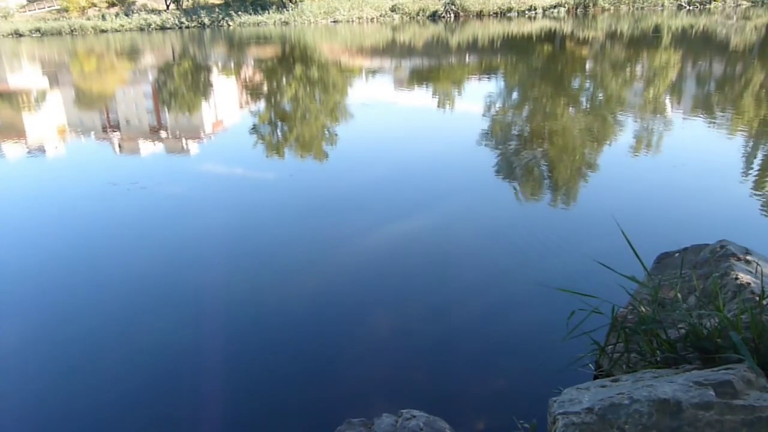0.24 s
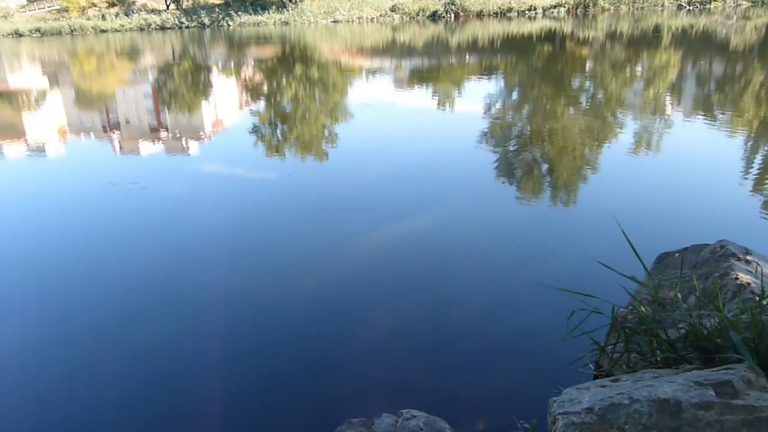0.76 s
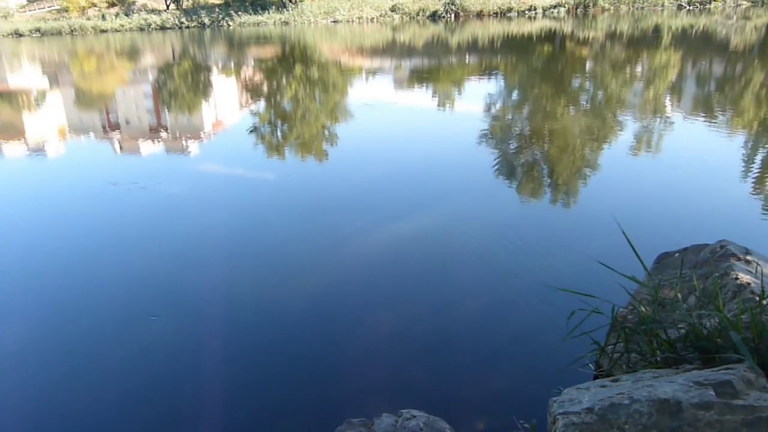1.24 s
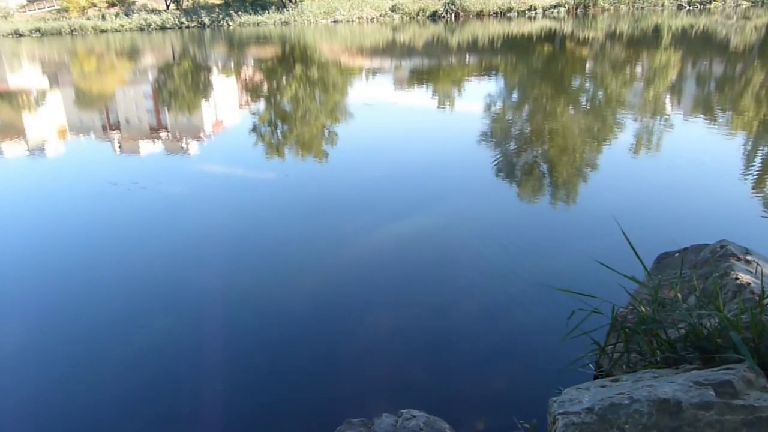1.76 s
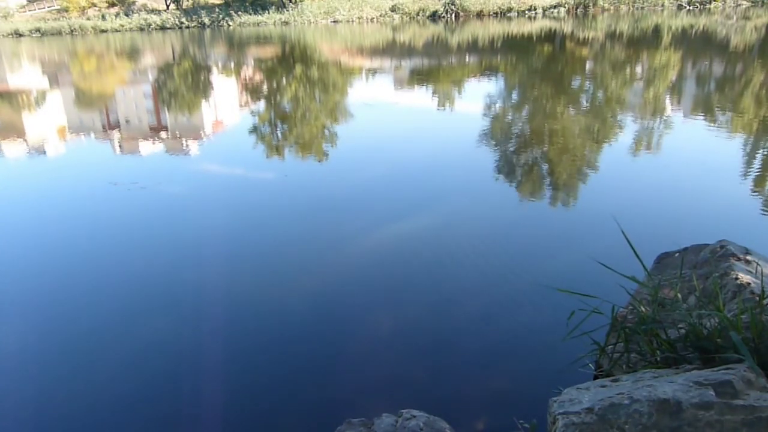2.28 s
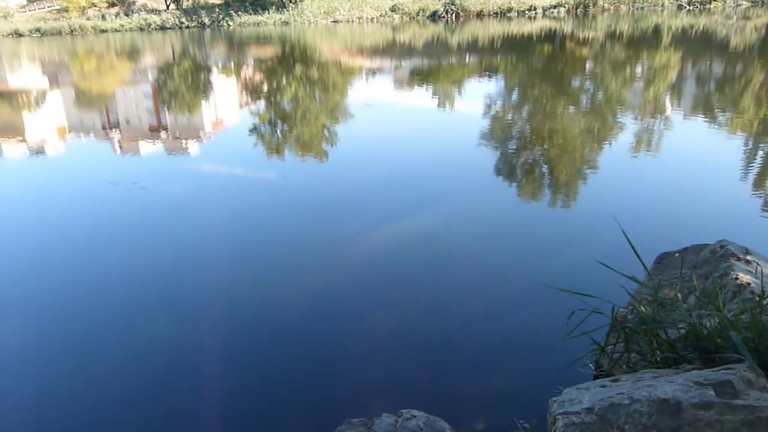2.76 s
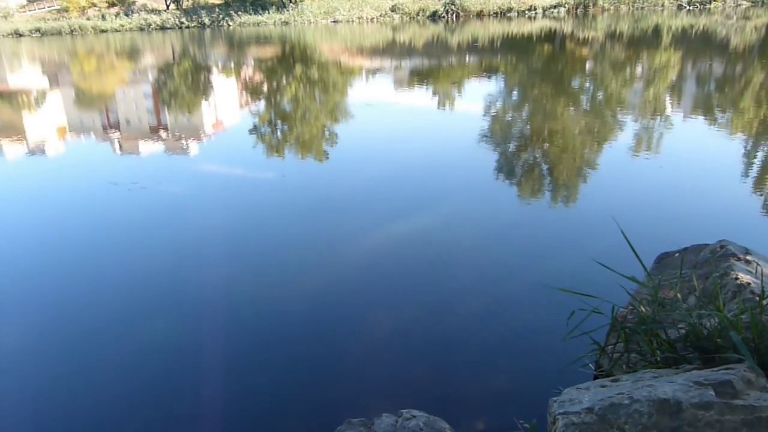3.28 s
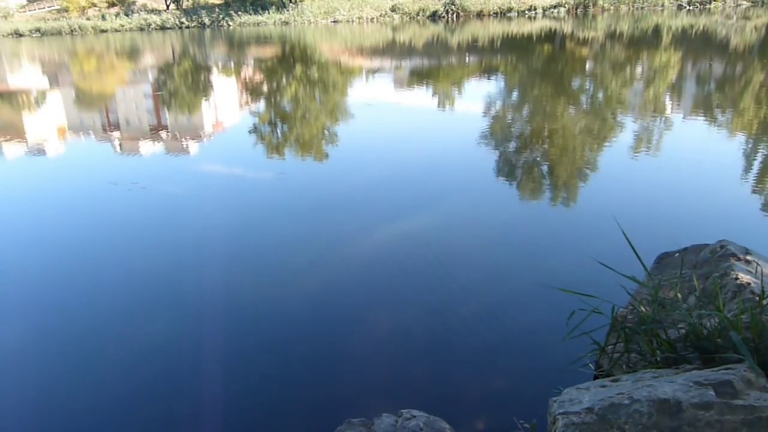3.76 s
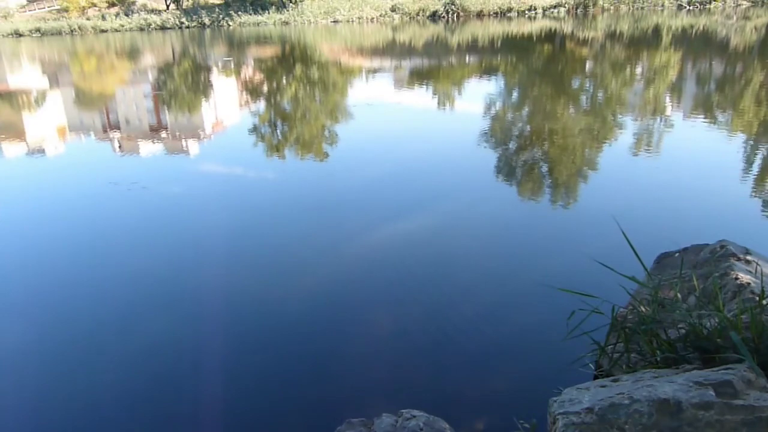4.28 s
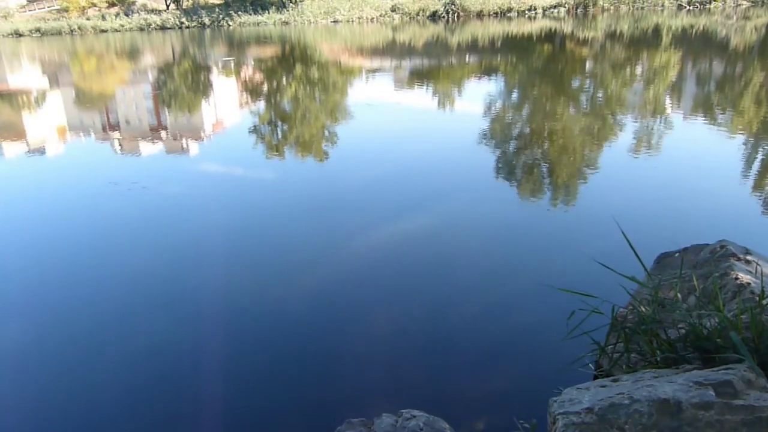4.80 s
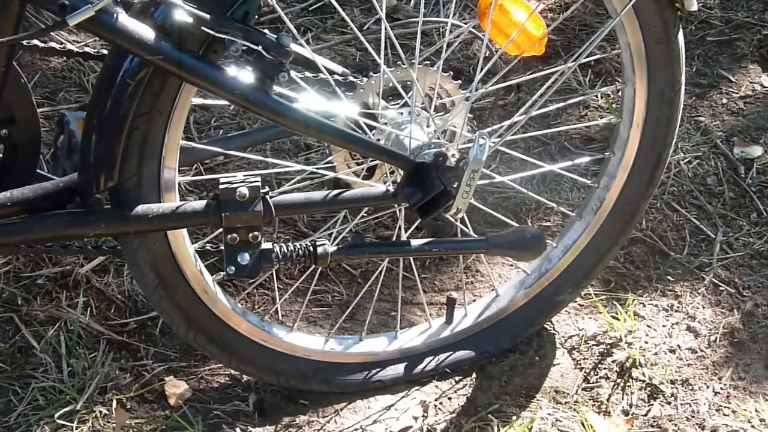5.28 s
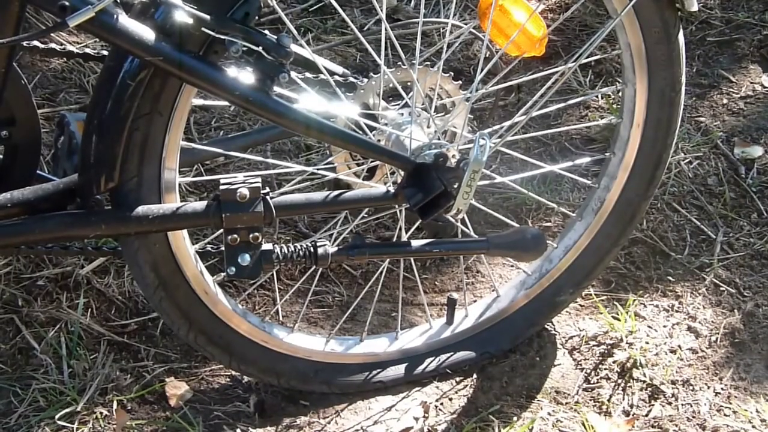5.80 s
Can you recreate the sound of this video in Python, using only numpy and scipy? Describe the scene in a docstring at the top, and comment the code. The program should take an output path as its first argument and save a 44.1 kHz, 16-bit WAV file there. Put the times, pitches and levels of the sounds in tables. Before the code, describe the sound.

A calm riverbank with a steady, low-level rush of distant water and trees. A near bird on the left gives a few very short, hard, high ticks; another on the right answers with thin, echoing chips. A faint far twitter rises late. Near five seconds everything drops to silence for a quarter second, then the rush returns with a different tone, leaning right, with four more chips. Stereo microphones outdoors.

```python
"""A near bird on the left gives sharp ticks over the steady rush of a quiet river bank.
Another bird answers with thinner chips from the trees on the right; a third twitters far off. All are
frequency-swept two-voice whistles, scattered by foliage through decaying impulse responses. Distant water
and trees are partly coherent shaped noise; rustling grass is band-limited noise bursts.
The sound drops out briefly near the end; after that the rush has another colour and leans to the right."""
import sys
import numpy as np
from scipy import signal
from scipy.fft import rfft, irfft
from scipy.io import wavfile
from scipy.ndimage import uniform_filter1d

SR = 44100
rng = np.random.default_rng(int(sys.argv[2]) if len(sys.argv) > 2 else 0)


def materialize(psi):
    """Save the field psi as 16-bit PCM at rate SR to the path in sys.argv[1].

    A 1-D psi becomes a single channel; in a 2-D psi each row is a channel.
    """
    bounded = np.clip(np.atleast_2d(psi).T, -1, 1)
    quanta = np.round(bounded * 32767).astype(np.int16)
    wavfile.write(sys.argv[1], SR, quanta)


N = 266628


def gain_of(db):
    """Decibel law: converts a level in dB to an amplitude factor."""
    return 10 ** (np.asarray(db) / 20)


def evened(x):
    """Root-mean-square normalisation: scales a signal to rms 1."""
    return x / np.sqrt(np.mean(x ** 2) + 1e-20)


def read(points, hz):
    """Logarithmic interpolation: reads a (frequency, value) table on a log-frequency axis."""
    f, value = np.transpose(points)
    return np.interp(np.log(hz + 1), np.log(f + 1), value)


def add(mix, start_s, sound):
    """Superposition: adds a stereo sound to the mix from its start time."""
    part = mix[:, round(start_s * SR):][:, :sound.shape[1]]
    part += sound[:, :part.shape[1]]


def waveform(spectra):
    """Overlap-add synthesis: turns short-time spectra (channels, frames, bins) into sound."""
    return signal.istft(spectra.transpose(0, 2, 1), nperseg=2048, noverlap=1536)[1][:, :N]


def sides(left_db):
    """Level difference: splits a left-right balance in dB into left and right gains."""
    return gain_of(np.array([left_db, -left_db]) / 2)


def syllable(length_s, top_hz, sweep_hz, rise, sag_hz, overshoot, low_voice, low_ratio,
             overtone_db, waver, low_fade=.1):
    """Frequency modulation: a whistle flicks up, overshoots and sags while a second syrinx voice sings along."""
    u = np.linspace(0, 1, round(length_s * SR))  # share of the syllable elapsed
    wobble = evened(uniform_filter1d(rng.standard_normal(4096), size=40))[:len(u)]
    flick = overshoot * np.exp(-((u - 2 * rise) / rise) ** 2) - np.exp(-(u / rise) ** 2)
    pitch_hz = (top_hz + sweep_hz * flick - sag_hz * u ** 4) * (1 + waver * wobble)
    phase = 2 * np.pi * np.cumsum(pitch_hz) / SR

    high = np.sin(np.pi * u).clip(0) ** 0.36 * np.exp(1j * phase)
    low = signal.windows.tukey(len(u), .22) * np.exp(-low_fade * u + 1j * low_ratio * phase)

    # squaring and multiplying the voices gives overtones about an octave up; noise roughens them
    overtones = low ** 2 + 0.44 * low * high + .25 * high ** 2
    roughness = evened(uniform_filter1d(rng.standard_normal(len(u)), size=8))
    overtones = overtones * (1 + .45 * roughness)
    return evened((high + low_voice * low + gain_of(overtone_db) * overtones).imag)


def outdoors(call, left_db, near_db, near_t60, far_db, far_t60, build, echo_s=0.02, echo_db=-40):
    """Convolution: direct call, quick scatter from leaves, a bank's echo and a longer tail from the trees."""
    t = np.arange(SR // 2) / SR
    noise = rng.standard_normal((3, 2, len(t)))
    sparse = rng.random((3, 2, len(t))) < .15
    leaves, trees, bank = noise * sparse

    # decay times (t60), build-up time and echo delay are in seconds
    leaves = leaves * gain_of(-60 * t / near_t60) * (t > .001)
    trees = trees * gain_of(-60 * t / far_t60) * (1 - np.exp(-t / build))
    bank = bank * np.exp(-((t - echo_s) / 0.0081) ** 2)
    paths = [(near_db, leaves), (far_db, trees), (echo_db, bank)]
    response = sum(gain_of(db) * path / np.linalg.norm(path, axis=1, keepdims=True) for db, path in paths)

    # the two microphones sit close and share much of the scatter
    response = response + 0.62 * response[::-1]
    # early scatter still comes from the bird's side
    response *= sides(left_db * np.exp(-t / .02)).clip(.2, 5)
    # the nearer microphone hears the direct call one sample sooner
    arrival = [int(left_db < 0), int(left_db > 0)]
    response[[0, 1], arrival] += sides(left_db)
    return signal.fftconvolve(call[None], response, axes=1)


# Relative spectrum of the distant rush: freq_hz [Hz], density_db [dB per Hz]
RUSH_SPECTRUM = [(13, -61), (22, -40.5), (66, -33), (117, -26), (209, -8), (414, -0.5), (516, -3),
                 (560, -2.5), (698, -4), (1310, -6), (1500, -6), (4040, -10), (6440, -16.5), (10600, -22.5),
                 (15500, -35.5)]
# Humps added to the low roar: freq_hz [Hz], width_hz [Hz], boost_db [dB]
ROAR_HUMPS = [(354, 59, 3.5), (474, 55, 2.5), (629, 66, -0.5), (770, 71, 1)]
# Level of the rush after the pause, on top of its spectrum: freq_hz [Hz], level_db [dB]
LATE_RUSH_LEVEL = [(100, -40.5), (500, -43.5), (1100, -42), (2500, -43.5), (7000, -44.5), (10500, -46.5),
                   (14000, -44)]
# Left-right likeness (correlation) of the rush: freq_hz [Hz], likeness [0 to 1]
RUSH_LIKENESS = [(40, .3), (75, 0.59), (130, 0.97), (300, 1), (640, 0.95), (1400, 0.68), (3100, 0.31),
                 (6000, 0.23), (8000, 1), (15000, 1)]
# Left-right balance of the rush before the pause: freq_hz [Hz], left_db [dB]
RUSH_BALANCE = [(100, 0.8), (380, 1.0), (700, 1.5), (1300, 4), (2400, 2.5), (4400, 2.4), (8100, .5),
                (15000, 0)]
# Phase by which the left channel leads: freq_hz [Hz], lead [radians]
RUSH_LEAD = [(100, 0.037), (400, 0), (1100, 0.2), (1900, 0.88), (2600, 0.66), (5500, 0.5), (7500, 0.044)]
RUSH_DB = -42.5  # steady level before the pause
LATE_SIDE = -.75  # factor on the left-right balance after the pause: the rush leans to the right


def rush(patchy_db=0.53, flicker_db=0.47):
    """Partial coherence: broad noise, alike in both channels by frequency, drifts in patches and flickers."""
    hz = np.fft.rfftfreq(2048, 1 / SR)
    t = np.arange(N // 512 + 5) * 512 / SR
    early = t[:, None] < np.mean(PAUSE_SPAN)
    a, b, c, d, patches = rng.standard_normal((5, len(t), len(hz)))

    likeness = np.clip(read(RUSH_LIKENESS, hz), -1, 1)
    left = a + 1j * b
    right = likeness * left + np.sqrt(1 - likeness ** 2) * (c + 1j * d)
    right = right * np.exp(-1j * read(RUSH_LEAD, hz))
    balance_db = read(RUSH_BALANCE, hz) * np.where(early, 1, LATE_SIDE)
    spectra = np.array([left, right]) * sides(balance_db)

    humps_db = sum(db * np.exp(-((hz - f) / width) ** 2) for f, width, db in ROAR_HUMPS)
    coloured = spectra * gain_of(read(RUSH_SPECTRUM, hz) + humps_db)

    # patches span neighbouring frames and bins; the flicker moves all frequencies together
    patches = evened(uniform_filter1d(uniform_filter1d(patches, size=8, axis=0), size=16, axis=1))
    flicker = rng.standard_normal((len(t), 1))
    drift_db = patchy_db * patches + flicker_db * flicker
    level_db = np.where(early, RUSH_DB, read(LATE_RUSH_LEVEL, hz))
    return waveform(coloured * gain_of(level_db + drift_db)) / waveform(coloured).mean(0).std()


# Faint high rustles in the grass: start_s [s], length_s [s], level_db [dB], centre_hz [Hz]
GRASS_RUSTLES = [(.835, 0.014, -56, 10500), (1.388, .3, -60, 13500), (2.274, .21, -61, 12000),
                 (2.329, 0.023, -46, 10400), (3.40, 0.087, -57, 11000), (4.13, .13, -64, 12500)]
RUSTLE_WIDTH_HZ = 1320  # standard deviation of the Gaussian band


def grass():
    """Band-limited noise: Gaussian filtering and a smooth window make small, soft high bursts."""
    out, hz = np.zeros((2, N)), np.fft.rfftfreq(SR, 1 / SR)
    for start_s, length_s, level_db, centre_hz in GRASS_RUSTLES:
        band = np.exp(-((hz - centre_hz) / RUSTLE_WIDTH_HZ) ** 2 / 2)
        fizz = evened(irfft(rfft(rng.standard_normal(SR)) * band))
        window = signal.windows.tukey(round(length_s * SR), .5)
        burst = window * fizz[:len(window)]
        add(out, start_s, gain_of(level_db) * np.tile(burst, (2, 1)))
    return out


TWITTER_END_S, TWITTER_STEP_S = 4.462, .088  # start of the last note, spacing of the notes
TWITTER_END_DB, TWITTER_GROWTH_DB_PER_S = -49, 19
TWITTER_END_HZ, TWITTER_CLIMB_HZ_PER_S = 4480, 710


def twitter(count):
    """Linear progression: evenly spaced notes (start_s, level_db, pitch_hz) swell and climb to the last."""
    return [(TWITTER_END_S - ahead_s,
             TWITTER_END_DB - TWITTER_GROWTH_DB_PER_S * ahead_s,
             TWITTER_END_HZ - TWITTER_CLIMB_HZ_PER_S * ahead_s)
            for ahead_s in TWITTER_STEP_S * np.arange(count)]


# Single far calls: start_s [s], level_db [dB], top pitch_hz [Hz]
SINGLE_FAR_CALLS = [(1.376, -46.5, 2058), (4.58, -54.5, 3970)]


def far_bird():
    """Reverberant blurring: strong scatter softens a distant twitter and two single lower notes."""
    out = np.zeros((2, N))
    for start_s, level_db, pitch_hz in SINGLE_FAR_CALLS + twitter(count=6):
        note = syllable(0.028, pitch_hz, sweep_hz=802, rise=0.279, sag_hz=708, overshoot=0.19,
                        low_voice=.3, low_ratio=1.0, overtone_db=-42, waver=0.044)
        heard = outdoors(note, .7, near_db=-4.0, near_t60=.1, far_db=-4.0, far_t60=0.44, build=.02)
        add(out, start_s, gain_of(level_db) * heard)
    return out


# Chips of the answering bird: start_s [s], level_db of the direct sound [dB], held pitch_hz [Hz]
ANSWERING_CHIPS = [(.485, -44, 7150), (.585, -46, 7100), (.703, -43.5, 7180), (.772, -43, 7220),
                   (.908, -42.5, 7220), (1.429, -45, 7440), (2.261, -45, 7340), (3.701, -44.5, 7220),
                   (3.870, -43.5, 7280), (4.136, -44.5, 7400), (5.531, -40.5, 7240), (5.702, -42, 7270),
                   (5.760, -44, 7180), (5.866, -41.5, 6740)]
CHIP_LEFT_DB = -3.5  # its perch is on the right
CHIP_FOOT_HZ = 5070  # a full chip sweeps up from about this pitch
# after a rest the first chip makes only a share of the sweep; each repeat adds more, up to the whole
BOUT_REST_S, OPENING_SWEEP, SWEEP_GROWTH = 1.1, .4, .35


def answering_bird():
    """Diffuse field: chips among trees carry more scatter than direct sound; sweeps deepen through a bout."""
    out, last_s, share = np.zeros((2, N)), -np.inf, 0
    for start_s, level_db, pitch_hz in ANSWERING_CHIPS:
        rested = start_s - last_s > BOUT_REST_S
        share = OPENING_SWEEP if rested else min(share + SWEEP_GROWTH, 1)
        chip = syllable(0.02, pitch_hz, share * (pitch_hz - CHIP_FOOT_HZ), rise=0.15, sag_hz=300,
                        overshoot=0.33, low_voice=0.45, low_ratio=.86, overtone_db=-29.5,
                        waver=.042, low_fade=1.6)
        heard = outdoors(chip, CHIP_LEFT_DB, near_db=-4, near_t60=0.3, far_db=0.5, far_t60=0.46,
                         build=0.019, echo_s=0.021, echo_db=-2.5)
        add(out, start_s, gain_of(level_db) * heard)
        last_s = start_s
    return out


# Ticks of the near bird: start_s [s], level_db [dB], top pitch_hz [Hz]
NEAR_TICKS = [(1.0096, -28, 7740), (1.2781, -30.5, 7910), (3.154, -29, 7810), (4.536, -25, 8265),
              (4.807, -25.7, 7700)]
TICK_S, TICK_LEFT_DB = .0078, 6.5  # every tick is equally long and comes from one perch on the left


def near_bird():
    """Transient radiation: very short, hard swept ticks arrive from close by on the left."""
    out = np.zeros((2, N))
    for start_s, level_db, pitch_hz in NEAR_TICKS:
        tick = syllable(TICK_S, pitch_hz, sweep_hz=1750, rise=0.27, sag_hz=656, overshoot=.05,
                        low_voice=0.36, low_ratio=.85, overtone_db=-21.0, waver=0.019)
        heard = outdoors(tick, TICK_LEFT_DB, near_db=-3.5, near_t60=.15, far_db=-5.0, far_t60=0.38,
                         build=0.0065)
        add(out, start_s, gain_of(level_db) * heard)
    return out


def scene():
    """Superposition: the rush and grass lie behind the three birds."""
    return rush() + grass() + far_bird() + answering_bird() + near_bird()


# Silent pause in all the sound: start_s [s], end_s [s]
PAUSE_SPAN = (5.016, 5.274)
EDGE_HZ = 15600  # upper band limit


def record(dry):
    """Gating and low-pass filtering: a short silent pause, then the band limit."""
    t = np.arange(N) / SR
    sounding = 1. * ((t < PAUSE_SPAN[0]) | (t > PAUSE_SPAN[1]))
    gate = uniform_filter1d(sounding, size=64)  # softens the edges of the pause
    low_pass = signal.firwin(511, EDGE_HZ, window=("kaiser", 9), fs=SR)
    return signal.oaconvolve(dry * gate, low_pass[None], "same")


dry = scene()
out = record(dry)
materialize(out)
```